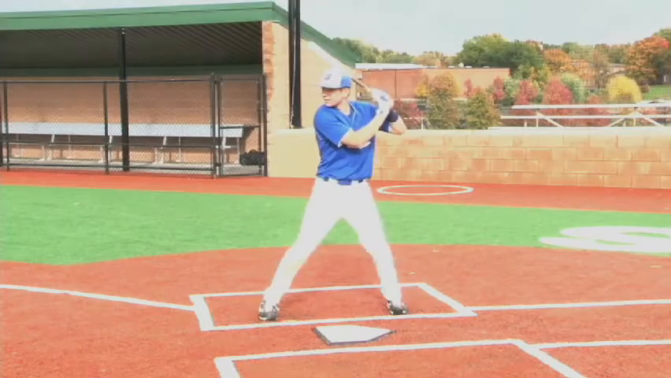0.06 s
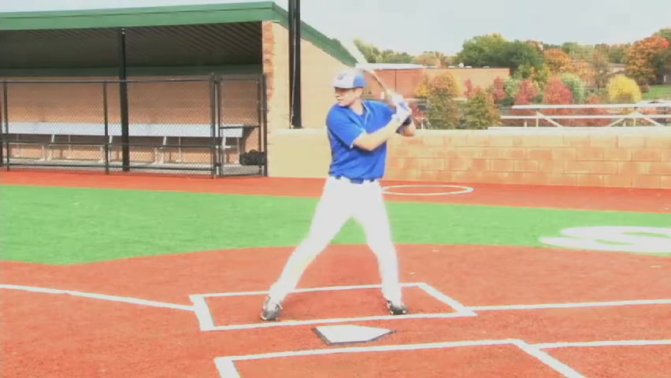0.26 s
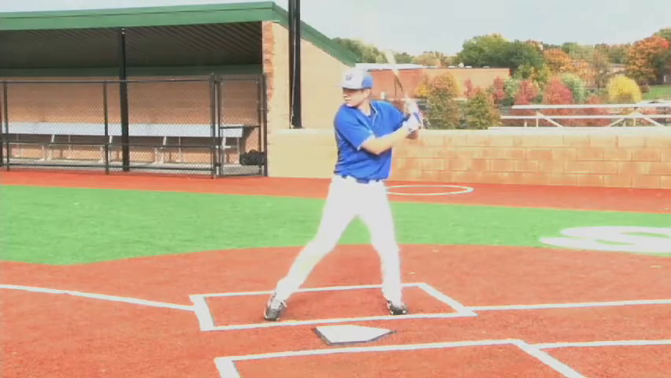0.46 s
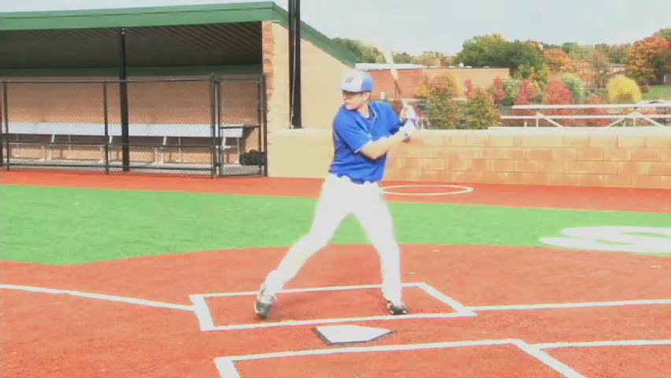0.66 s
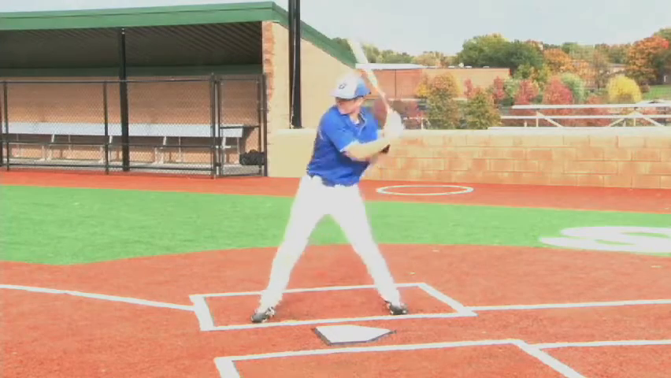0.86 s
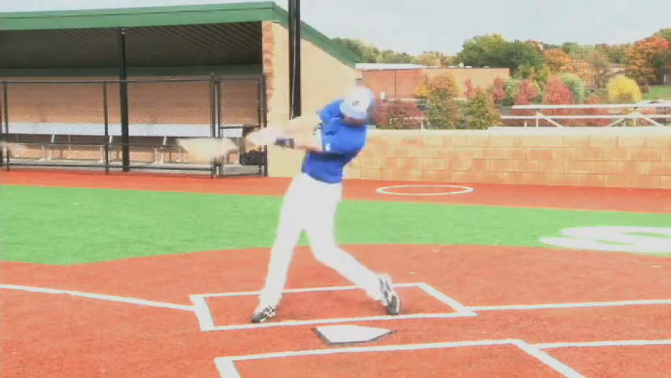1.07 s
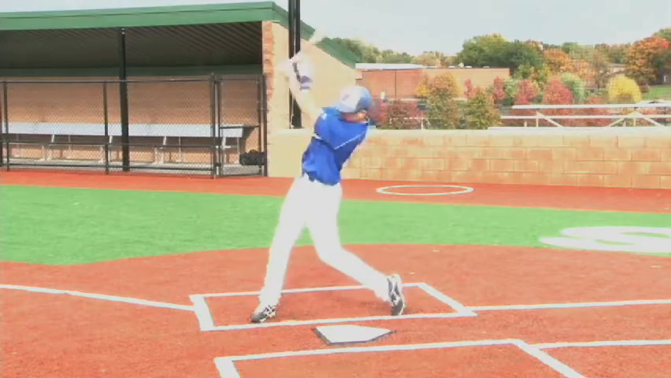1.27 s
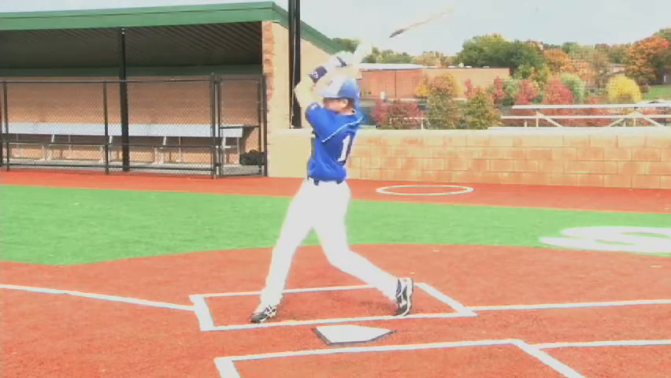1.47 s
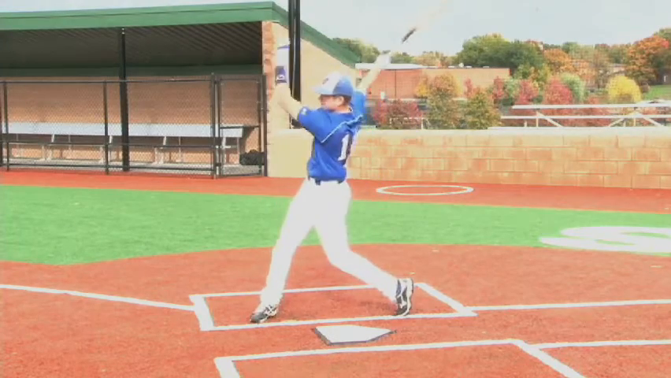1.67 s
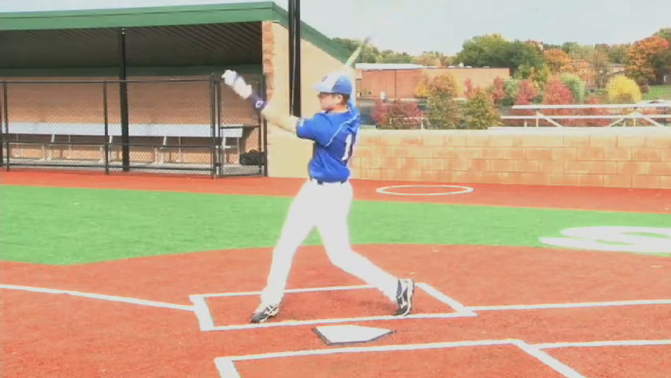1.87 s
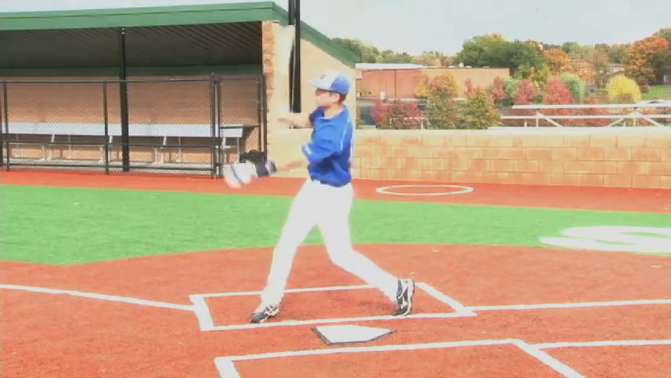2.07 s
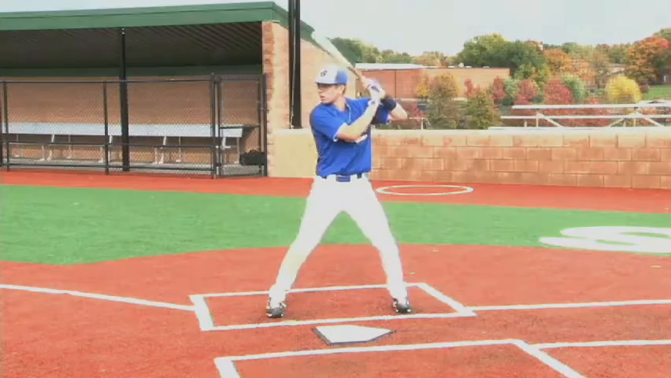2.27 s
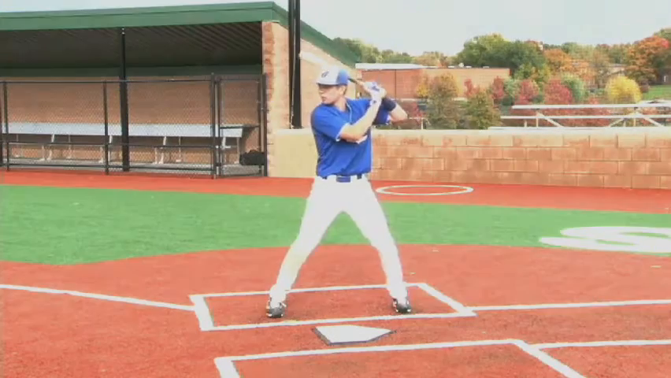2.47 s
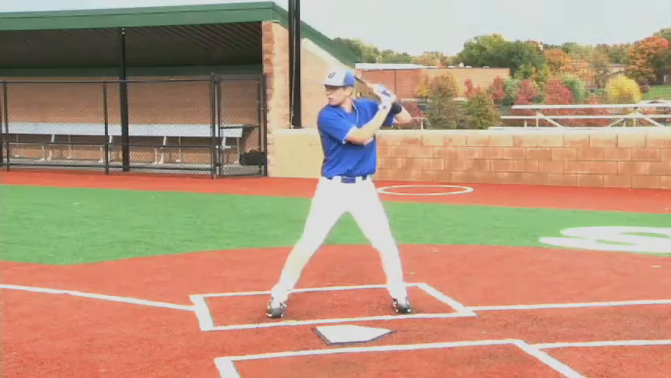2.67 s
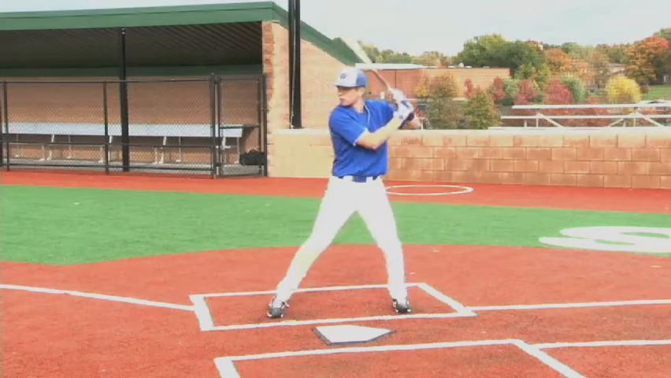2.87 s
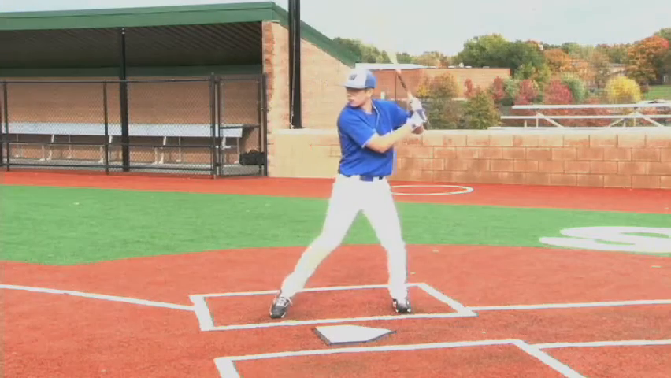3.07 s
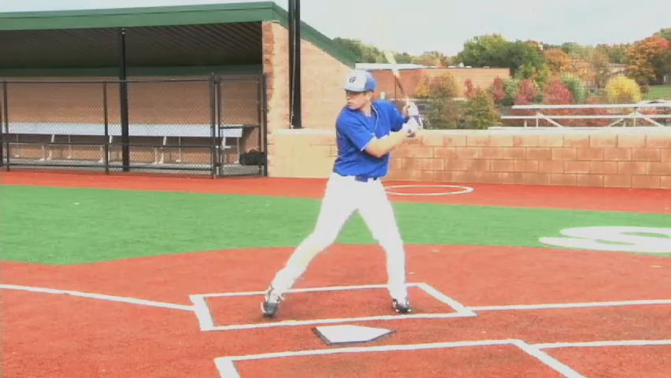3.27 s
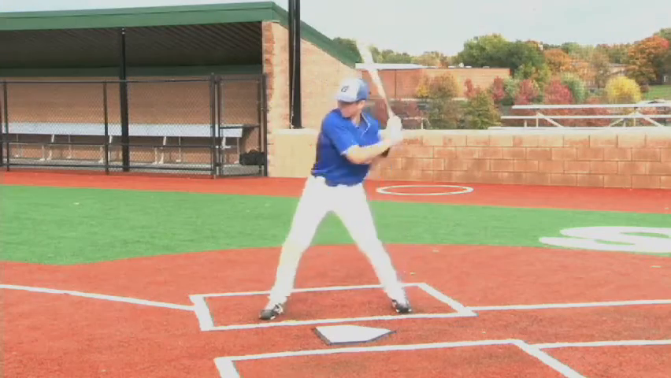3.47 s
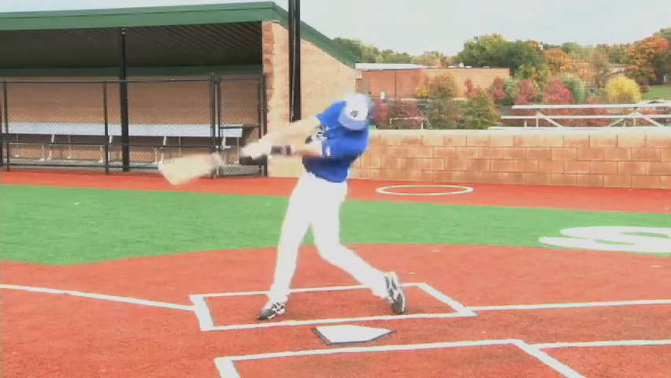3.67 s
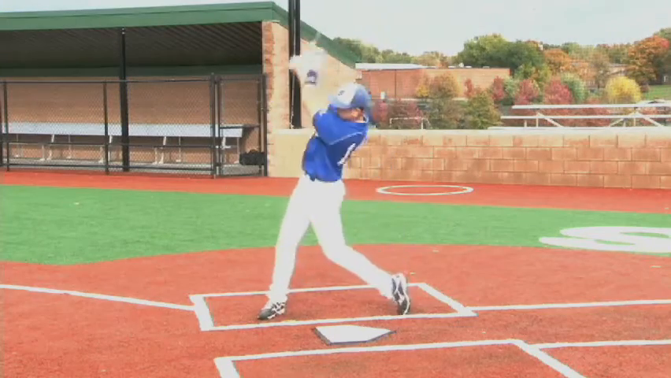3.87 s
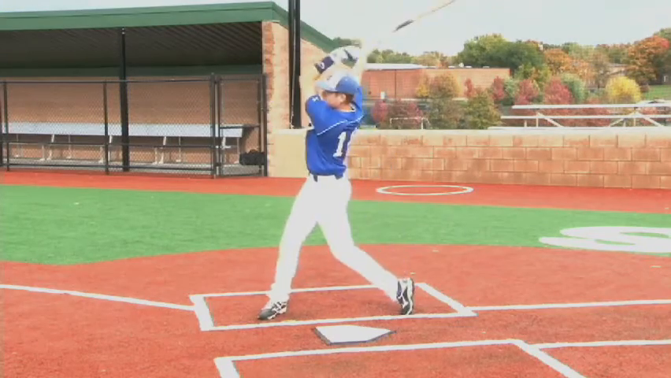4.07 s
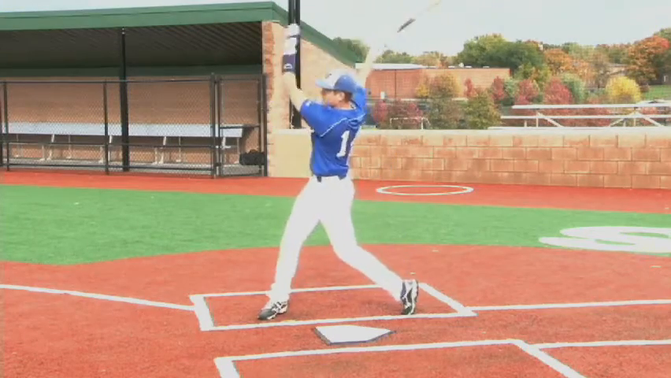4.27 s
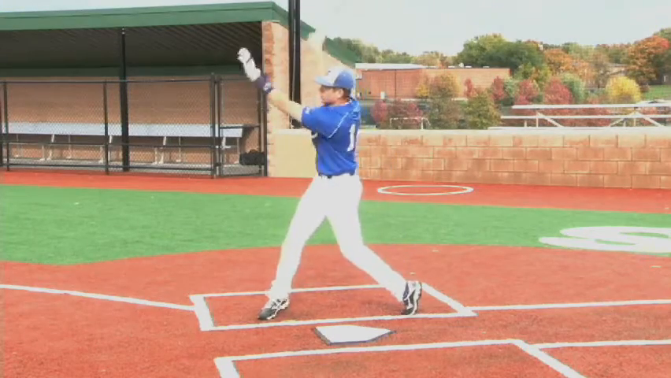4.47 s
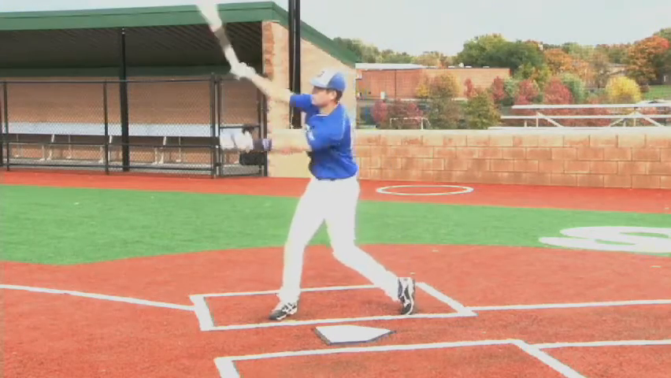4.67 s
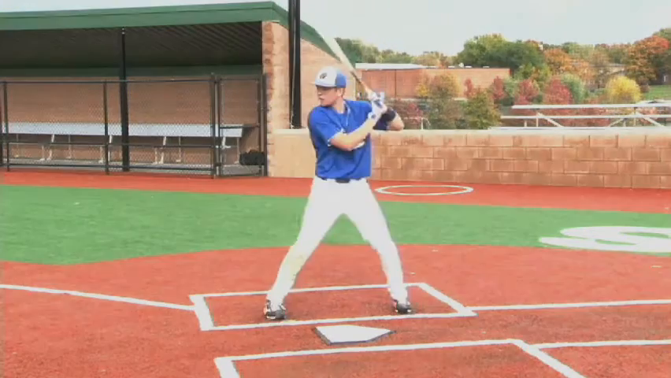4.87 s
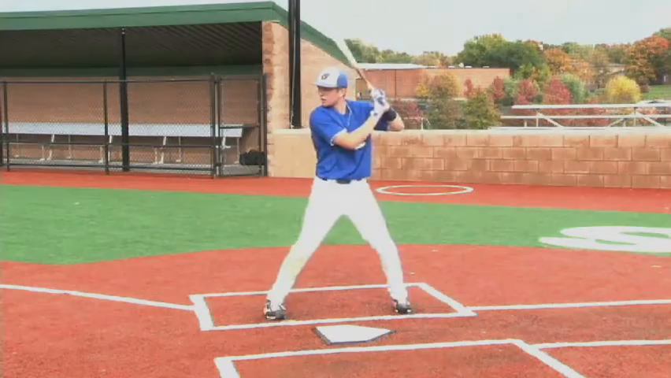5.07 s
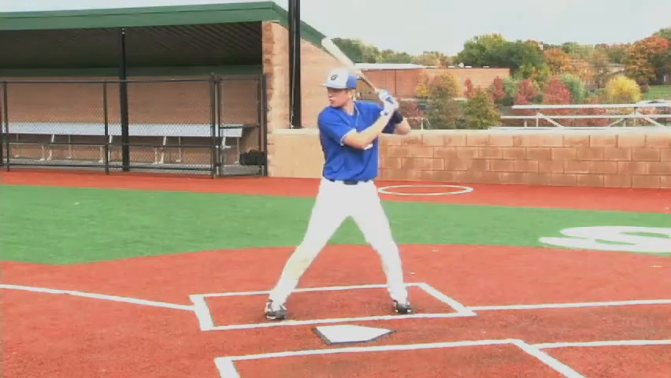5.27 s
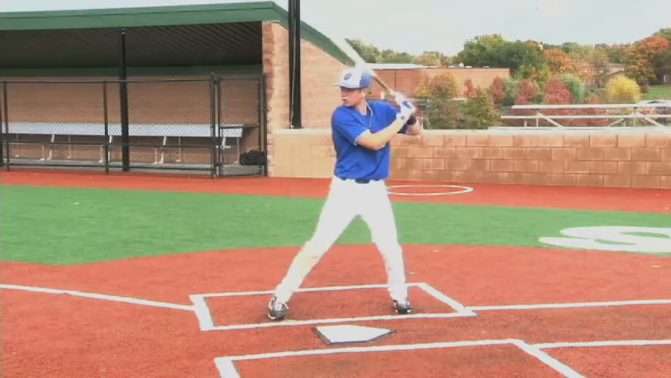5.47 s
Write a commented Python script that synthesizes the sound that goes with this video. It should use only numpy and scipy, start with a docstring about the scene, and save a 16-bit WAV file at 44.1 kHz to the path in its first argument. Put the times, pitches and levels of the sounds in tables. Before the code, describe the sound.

Over low buffeting wind and faint traffic, a wooden bat cracks hard against a ball twice, with slapping echoes and a short fading wash.

```python
"""Batting practice on an open field: two swings, each a swish and a dry crack of a wooden bat on the ball.
The crack is a broadband contact pulse plus decaying modes; dugout, walls, rails and stands throw it back
as band-limited echoes, ticks and a diffuse tail. Band-passed noise makes soft swells, mid-pitched and high;
shaped noise makes the wind rumble on the microphone and the distant traffic. The cracks overload the input,
whose gain drops and stays down until the next stretch of the background begins."""
import sys
import numpy as np
from scipy import signal
from scipy.fft import rfft, irfft
from scipy.io import wavfile

SR = 44100
rng = np.random.default_rng(int(sys.argv[2]) if len(sys.argv) > 2 else 0)


def wav_out(sig):
    """Save sig, one row per channel (or a flat mono array), as 16-bit PCM at SR to the path in sys.argv[1]."""
    wavfile.write(sys.argv[1], SR, np.round(np.clip(np.atleast_2d(sig).T, -1, 1) * 32767).astype(np.int16))


N = 243111
TIME = np.arange(N) / SR
AGE = TIME[:SR]  # the second after a blow
SNAP_DB = 10  # energy of the snap, near or far
CLIP_LEVEL = 0.51  # share of full scale

# the swings: (contact [s], factor on the modes' decay times [1], delay of the ground bounce [s],
# nearby scatter [dB], swish peak [dB], time constant of the swish's rise [s])
SWINGS = [(1.1431, 0.94, .00146, -3.5, -45, 0.045), (3.7397, 0.94, .00117, -6, -50, 0.097)]
# background stretches, which differ in level: (start [s], distant traffic [dB], tyre roar [dB])
STRETCHES = [(0, -51, -60), (2.221, -50.5, -72), (4.923, -50, -63.5)]


def undb(db):
    """Decibels become an amplitude ratio, 20 dB to a factor of ten."""
    return 10 ** (np.asarray(db) / 20)


def log_gain(points, size):
    """A (frequency [Hz], level [dB]) spectrum, interpolated over log frequency, as natural log gain per bin."""
    hz, db = np.transpose(points)
    bins = np.maximum(np.fft.rfftfreq(size, 1 / SR), 1)
    return np.log(undb(np.interp(np.log(bins), np.log(hz), db)))


def noise(points, size=N):
    """Spectral shaping: white noise filtered to the given spectrum, at rms 1."""
    spectrum = rfft(rng.standard_normal(size)) * np.exp(log_gain(points, size))
    x = irfft(spectrum, size)
    return x / x.std()


def pulse(points, size=1024):
    """Minimum phase: folding the cepstrum gives the sharpest causal pulse of a spectrum, at energy 1."""
    cepstrum = irfft(log_gain(points, size))
    cepstrum[1:size // 2] *= 2
    cepstrum[size // 2 + 1:] = 0
    return unit(irfft(np.exp(rfft(cepstrum))))


def unit(x):
    """Normalisation to energy 1, the sum of squares."""
    return x / np.sqrt(np.sum(x ** 2))


def band(x, low_hz, high_hz, order=2):
    """Band-pass filtering between two edges, maximally flat within."""
    edges = [low_hz, np.clip(high_hz, low_hz + 20, SR / 2 - 20)]
    return signal.sosfilt(signal.butter(order, edges, "bandpass", fs=SR, output="sos"), x)


def add(out, x, s):
    """Superposition: mix x into out from time s on."""
    i = max(int(round(s * SR)), 0)
    out[i:i + len(x)] += x[:len(out) - i]


def decay(t, t60):
    """Exponential decay, down 60 dB after t60 seconds."""
    return np.exp(-np.log(1000) * t / t60)


def swell(s, half):
    """A Gaussian envelope that peaks at 1 at time s and falls to 1/e after half seconds."""
    return np.exp(-np.minimum(((TIME - s) / half) ** 2, 20))


def scatter(t60, size=4096):
    """Scattering: many tiny reflections form a fading cloud of noise, at energy 1."""
    t = TIME[:size]
    onset = 1 - np.exp(-t / 0.001)
    return unit(rng.standard_normal(size) * decay(t, t60) * onset)


def wind():
    """Turbulent pressure: a breeze rumbles and buffets the microphone, gusts add to it, eddies make all flutter."""
    # spectra, each scaled to rms 1: (frequency [Hz], level [dB])
    rumble_spectrum = [(12, -17), (24, -1), (40, 7), (70, 5), (100, 3.5), (135, -10.5), (250, -59),
                       (1500, -110)]
    buffet_spectrum = [(70, -14), (115, -0.5), (180, -4), (260, -10.5), (400, -18), (700, -30.5),
                       (1500, -88.5), (5000, -110)]
    # rate spectrum of the flutter: (frequency [Hz], level [dB])
    eddies = [(1, -2), (6, 9), (14, -2), (40, -52.5), (150, -130)]
    # the breeze between gusts: (time [s], rumble level [dB])
    breeze_levels = [(0, -46), (.42, -46.5), (.8, -41.5), (1.3, -39), (1.6, -44), (2.1, -45), (2.3, -50.5),
                     (2.85, -47), (3.4, -44), (3.85, -44.5), (4.3, -39.5), (4.65, -42.5), (5.03, -50.5),
                     (5.5, -44.5)]
    # gusts: (peak [s], half length to 1/e [s], rumble level [dB], buffeting relative to the rumble [dB],
    # pitch factor of the buffeting [1])
    gusts = [(0.039, 0.025, -37.5, -11, 1.1), (0.252, 0.071, -38, -3.5, 1), (0.546, 0.035, -35.5, -5, 0.89),
             (0.637, 0.028, -35, -13, 1), (0.84, 0.071, -40, -13, 1), (1.116, 0.084, -45.5, 9, 1.04),
             (1.741, 0.087, -48, 8.5, 1.32), (1.929, 0.082, -49.5, 8, 1.1),
             (2.977, 0.024, -37.5, -2.5, 1.01), (3.152, 0.14, -37.5, -5, .95), (3.571, 0.011, -32, -20, 1),
             (3.683, 0.056, -36.5, -17, 0.94), (3.965, 0.024, -45, 2.5, 1.07),
             (4.132, 0.045, -45.5, 1, 1.07), (4.85, 0.08, -39, -1.5, .95)]
    breeze_buffet_db = -3.5  # relative to the rumble
    flutter_db = 1  # standard deviation

    breeze = undb(np.interp(TIME, *np.transpose(breeze_levels)))
    rumble_power = breeze ** 2
    buffet = breeze * undb(breeze_buffet_db) * noise(buffet_spectrum)
    for s, half, db, buffet_db, pitch in gusts:
        gust = undb(db) * swell(s, half)
        rumble_power = rumble_power + gust ** 2
        air = noise([(hz * pitch, level) for hz, level in buffet_spectrum], size=SR)
        buffet = buffet + undb(buffet_db) * gust * np.resize(air, N)
    flutter = undb(flutter_db * noise(eddies))
    rumble = noise(rumble_spectrum) * np.sqrt(rumble_power)
    return flutter * (rumble + buffet)


def traffic():
    """Many incoherent sources sum to noise: a distant, wavering roar of engines and tyres, level set by stretch."""
    # spectra, each scaled to rms 1: (frequency [Hz], level [dB])
    traffic_spectrum = [(100, 15.5), (300, -0.5), (600, -2.5), (1000, -3.5), (1650, -6.5), (2400, -13),
                        (4000, -18), (7500, -27), (10000, -34), (14000, -38.5), (15500, -62.5)]
    tyre_spectrum = [(300, -13.5), (600, 1.5), (800, 1.5), (1200, -6), (2000, -9.5), (5000, -42)]
    starts, traffic_db, tyres_db = np.transpose(STRETCHES)
    stretch = np.searchsorted(starts[1:], TIME)
    waver_db = 0.44 * noise([(1, 13.0), (4, -28.5), (20, -27.0), (100, -92.5)])
    distant = noise(traffic_spectrum) * undb(traffic_db[stretch])
    tyres = noise(tyre_spectrum) * undb(tyres_db[stretch])
    return (distant + tyres) * undb(waver_db)


def soft_swells():
    """Band-limited noise under Gaussian envelopes: soft, grainy swells, mid-pitched and high, each with its colour."""
    # soft noise swells, mid-pitched and high: (peak [s], half length to 1/e [s], peak level [dB],
    # centre [Hz], width as a share of the centre [1])
    swells = [(0.117, 0.068, -75.5, 5700, 0.32), (.33, 0.022, -84, 5300, .3), (.56, 0.074, -60, 1550, .35),
              (.563, 0.041, -71.5, 6900, 0.44), (.69, 0.073, -67.5, 6700, 0.48),
              (0.995, 0.022, -67.5, 7360, 0.47), (1.004, 0.053, -69, 3500, 0.11),
              (1.69, 0.13, -61, 1446, 0.3), (2.271, 0.062, -62, 1540, 0.18),
              (2.353, .04, -70.5, 7000, 0.35), (2.37, .05, -62.5, 1660, 0.35), (2.5, 0.047, -68, 2500, .45),
              (2.518, 0.047, -71.5, 6660, 0.3), (2.66, 0.063, -73.5, 4900, .2),
              (2.7, 0.085, -73.5, 6200, .6), (2.781, 0.02, -66, 1730, 0.087), (3.07, 0.08, -75, 7650, 0.41),
              (3.268, 0.092, -70, 6800, 0.48), (3.442, 0.011, -71, 6300, .6),
              (3.55, 0.019, -72.5, 8500, 0.5), (4.138, 0.032, -71, 6700, 0.53),
              (4.829, 0.023, -69, 5396, 0.36), (5.122, 0.067, -59.5, 1090, 0.84),
              (5.17, .06, -70.5, 3380, 0.56)]
    grain_db = 4 * noise([(1, 2.5), (120, -31), (500, -58)])
    grainy = rng.standard_normal(N) * undb(grain_db)
    out = np.zeros(N)
    for s, half, db, hz, width in swells:
        near = np.abs(TIME - s) < 0.3
        colour = band(grainy[near], hz * (1 - min(width, 1) / 2), hz * (1 + width / 2))
        out[near] += undb(db) * swell(s, half)[near] * colour / colour.std()
    return out


def swish(s, db, rise, air):
    """Aerodynamic noise: air rushes louder as the bat speeds up to the contact, then dies away."""
    speed = np.exp(np.minimum((TIME - s) / rise, (s - TIME) / 0.025))
    return undb(db) * speed * air


def crack(swing, snap, ring_length, ground_s, near_db):
    """Impact excites modes: the contact snaps, bat and ball ring, ground and nearby things reflect the snap."""
    # modes; the spot of contact sets each one's share: (frequency [Hz],
    # 60 dB decay time before the swing's factor [s], first swing [dB], second swing [dB])
    bat_modes = [(180.9, .049, -23.5, -31), (315, 0.012, -19.5, -22), (480, .0085, -10.5, -15),
                 (680, .0107, -10, -11), (990, .012, -22, -10), (1180, 0.034, -19.5, -23.5),
                 (1425, 0.019, -10, -25.5), (1490, 0.019, -20, -16), (1700, .0104, -19.5, -25.3),
                 (1760, .032, -20.3, -25), (2218, 0.0073, -13.8, -14.7), (2550, .0157, -26.7, -15.2),
                 (3460, .0185, -20.5, -10.5), (3677, .016, -9.8, -11), (4314, .0092, -12.5, -14),
                 (5320, .0045, -5.6, -4.3), (6300, .0083, -10.1, -10.7), (7760, .0075, -15, -12.5),
                 (9360, .0026, -11.5, -18)]
    ground_db, ground_hz = -2, 7000
    near_t60_s, near_hz = 0.021, 2960
    yard_db, yard_t60_s = -30, 0.12

    out = np.zeros(SR)
    for k, (hz, t60, *db) in enumerate(bat_modes):
        sign = (-1) ** k  # neighbouring modes start in opposite directions
        out += sign * undb(db[swing]) * np.sin(2 * np.pi * hz * AGE) * decay(AGE, t60 * ring_length)
    add(out, snap, 0)
    add(out, undb(ground_db) * band(snap, 190, ground_hz), ground_s)  # turf swallows the treble
    # things around the plate scatter strongly and briefly, the turf beyond faintly and for longer
    clouds = undb(near_db) * scatter(near_t60_s) + undb(yard_db) * scatter(yard_t60_s)
    add(out, band(signal.fftconvolve(snap, clouds), 350, near_hz, order=1), 0.003)
    return out


def bat_colour(swing):
    """Resonant filtering: the bat's resonances colour what it sends across the field, as a short response."""
    # (frequency [Hz], first swing [dB], second swing [dB])
    resonances = [(600, 2.5, 1), (1000, -1, -1), (1350, -0.5, 1), (1800, 4, 0.5), (2200, 0, 0),
                  (2670, -5, -4), (3130, -6, -3), (3540, -0.5, 1.5), (4300, 2.5, 1), (5300, -3.5, 0),
                  (6400, 0, 0), (7400, -1, -3.5), (9000, 0, 0)]
    return pulse([(hz, db[swing]) for hz, *db in resonances])


def relief(x):
    """All-pass dispersion: a wall's uneven face draws a click out into a few cycles, keeping its colour."""
    slowest_hz = 4300  # this part lingers longest
    spread_s = 0.00025  # time constant
    b, a = signal.iirpeak(slowest_hz, np.pi * slowest_hz * spread_s, fs=SR)
    return x - 2 * signal.lfilter(b, a, x)


def echoes(snap):
    """Specular and diffuse reflection: walls return a thinner, duller snap, trailed by scatter from rough faces."""
    # echoes off dugout, walls and stands: (time [s], level [dB], low edge [Hz], high edge [Hz],
    # scatter [dB], full-band share [dB], ground bounce [dB])
    reflections = [(1.1702, -22.5, 1180, 2700, -3, -17, -15), (1.1804, -7.5, 1150, 2960, -1.5, -17, -21),
                   (1.1883, 0, 1400, 2960, -5, -20.5, -25), (1.2, -17, 1400, 3200, -2, -17, -22),
                   (1.2059, -8.5, 2010, 3350, -1, -23, -20), (1.2069, 3.5, 1480, 2250, -9.5, -23, -24),
                   (1.2546, -13.5, 750, 4300, -5, -26, -24), (1.2915, -14.5, 700, 6800, -16, -4, -24),
                   (3.777, -14, 1100, 3000, 0, -13.5, -19), (3.7845, -2, 1350, 3300, -9, -16.5, -22),
                   (3.799, -26, 1400, 3800, 4, -18, -13), (3.803, -7, 1330, 3100, -9, -16, -20),
                   (3.812, -20, 1300, 2800, -3, -31, -15), (3.8514, -14.5, 720, 3400, -7, -19, -22),
                   (3.887, -17, 850, 6500, -11, -9.5, -9)]
    outfield_s = 0.09  # later echoes come from across the field
    ground_s = 0.00087
    glance_hz = 9000

    out, contacts = np.zeros(N), np.array(SWINGS)[:, 0]
    for s, db, low_hz, high_hz, scatter_db, glance_db, ground_db in reflections:
        swing = np.searchsorted(contacts, s) - 1
        wall = undb(scatter_db) * scatter(t60=0.029)
        wall[0] += 1  # the mirror reflection
        back = relief(signal.fftconvolve(snap, wall))
        if s - contacts[swing] > outfield_s:
            back = signal.fftconvolve(back, bat_colour(swing))
        # a little of the whole spectrum comes back beside the wall's own band
        own_band = band(band(back, low_hz, high_hz), 570, 15000)
        glance = undb(glance_db) * band(back, 300, glance_hz, order=1)
        echo = undb(db) * (own_band + glance)
        add(out, echo, s)
        add(out, undb(ground_db) * echo, s + ground_s)  # the same echo by way of the ground
    return out


def field(swing):
    """Reverberation: stands and trees keep up a grainy wash while echoes arrive; it then fades, treble faster."""
    # diffuse sound of the field: (frequency [Hz], level [dB])
    field_spectrum = [(200, -38.5), (600, -17), (1100, -1), (1800, 0.5), (2700, 0.5), (3600, 0),
                      (4700, -5.5), (6000, -7), (9000, -17), (12000, -25), (14500, -38), (16000, -65)]
    level_db = -14.5  # energy relative to the snap
    delay_s, bloom_s = 0.0374, 0.12  # onset, start of the fade
    t60_s, treble_t60_s = 0.63, 0.56
    grain_db = 3 * noise([(1, -3), (400, 11.5), (1500, -49.0)], size=SR)

    glints = rng.standard_normal(SR) * undb(grain_db)
    response = np.convolve(pulse(field_spectrum), bat_colour(swing))
    wash = signal.fftconvolve(glints, response)[:SR]
    treble = band(wash, 4500, 16000, order=1)
    fade_age = np.maximum(AGE - bloom_s, 0)
    tail = (wash - treble) * decay(fade_age, t60_s) + treble * decay(fade_age, treble_t60_s)
    onset = np.clip((AGE - delay_s) / 0.011, 0, 1)
    return undb(level_db + SNAP_DB) * unit(tail * onset)


def railings(snap, count=9):
    """Small obstacles scatter short waves best: rails and posts return the snap's top as tiny ticks."""
    tick_db, low_hz = -30.5, 6000  # level of the strongest possible tick
    first_s, last_s = 0.055, 0.14
    out, tick = np.zeros(SR), band(snap, low_hz, 12500)
    for place, strength in rng.random((count, 2)):
        add(out, undb(tick_db) * strength * tick, first_s + place * (last_s - first_s))
    return out


def batting():
    """Source and surroundings superpose: each swing's swish, crack, field wash and rail ticks, then the echoes."""
    # rushing air: (frequency [Hz], level [dB])
    swish_spectrum = [(100, -33), (250, -1.5), (500, 7), (1000, -6), (2000, -16.5), (4000, -13),
                      (7500, -17.5), (11000, -26), (14500, -37), (16000, -60)]
    # pressure snap of the contact: (frequency [Hz], level [dB])
    snap_spectrum = [(60, -20), (200, -3), (450, -6.5), (800, 1.2), (1500, -.5), (3000, 1.13), (4200, 4.5),
                     (6000, -5.2), (9000, -2.5), (15000, -2.5)]
    # the snap as it returns from the walls, with a duller top: (frequency [Hz], level [dB])
    far_snap_spectrum = [(100, -9.5), (400, -1), (800, 2.5), (1200, 4), (1800, 1.5), (3000, -0.5),
                         (4200, 0), (6000, 0), (9000, -5), (12000, -12), (14500, -15), (16000, -35)]
    out, air = np.zeros(N), noise(swish_spectrum)
    snap = undb(SNAP_DB) * pulse(snap_spectrum)
    far_snap = undb(SNAP_DB) * pulse(far_snap_spectrum)
    for swing, (s, ring_length, ground_s, near_db, swish_db, rise) in enumerate(SWINGS):
        out += swish(s, swish_db, rise, air)
        add(out, crack(swing, snap, ring_length, ground_s, near_db), s)
        add(out, field(swing) + railings(far_snap), s)
    return out + echoes(far_snap)


def scene():
    """Linear superposition of all sources, in one channel."""
    return (wind() + traffic() + soft_swells() + batting())[None]


def record(dry):
    """Gain control and clipping: an overload turns the gain down, held there until the next stretch begins."""
    duck_db, duck_s = -5, 0.0089  # drop in gain, its time constant
    top_hz = 16300
    starts = [int(s * SR) for s, *_ in STRETCHES[1:]]
    parts = np.split(np.abs(dry[0]), starts)
    peak_so_far = np.concatenate([np.maximum.accumulate(part) for part in parts])
    overloaded = peak_so_far > CLIP_LEVEL
    pole = np.exp(-1 / (duck_s * SR))
    gain = undb(duck_db * signal.lfilter([1 - pole], [1, -pole], overloaded))
    out = np.clip(dry * gain, -CLIP_LEVEL, CLIP_LEVEL)
    return signal.sosfilt(signal.ellip(8, 0.2, 70, top_hz, fs=SR, output="sos"), out)


dry = scene()
out = record(dry)
wav_out(out)
```